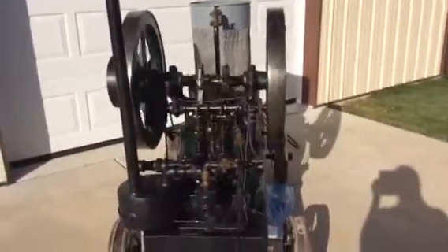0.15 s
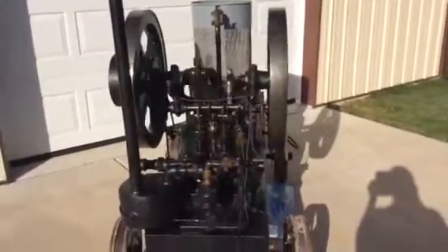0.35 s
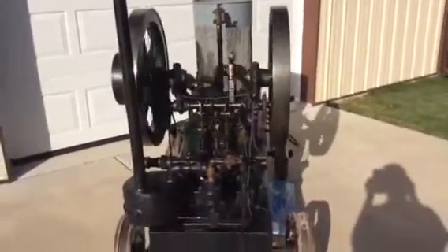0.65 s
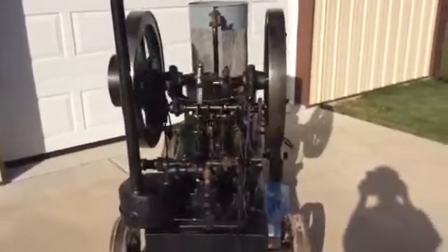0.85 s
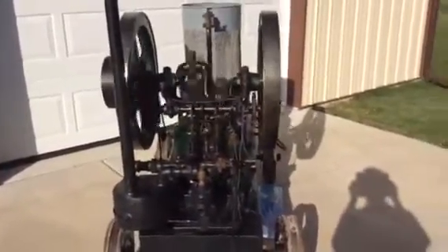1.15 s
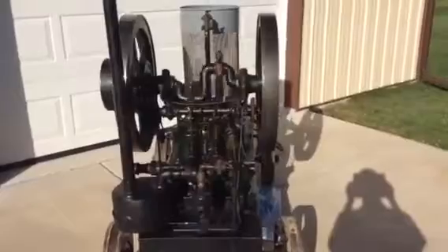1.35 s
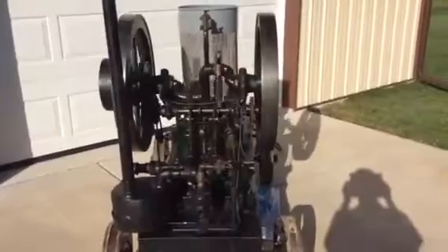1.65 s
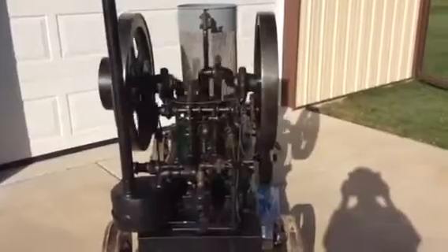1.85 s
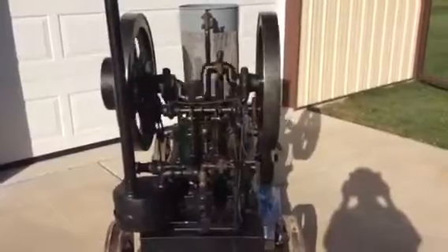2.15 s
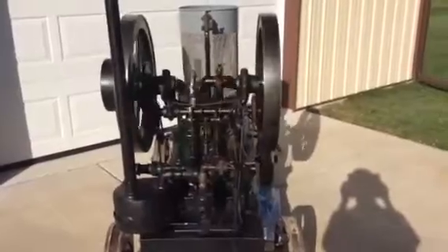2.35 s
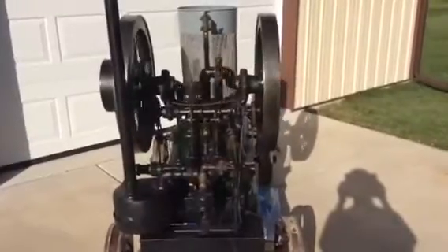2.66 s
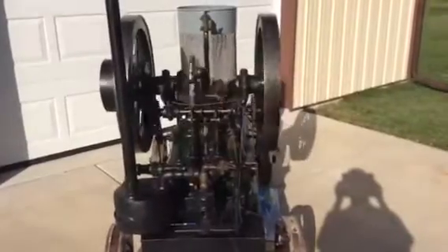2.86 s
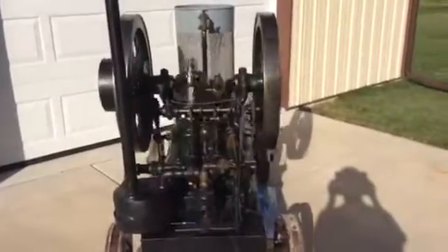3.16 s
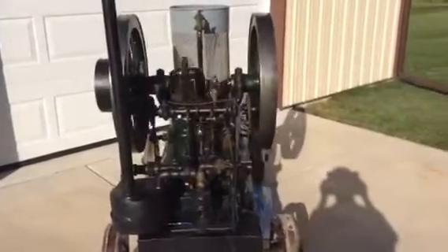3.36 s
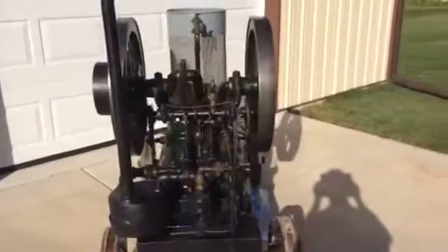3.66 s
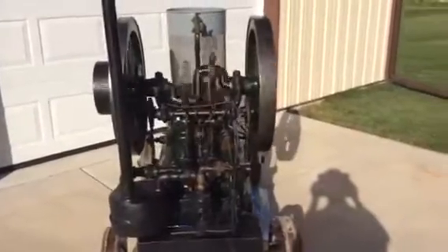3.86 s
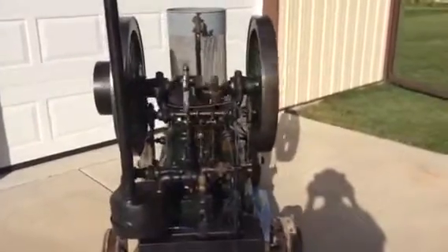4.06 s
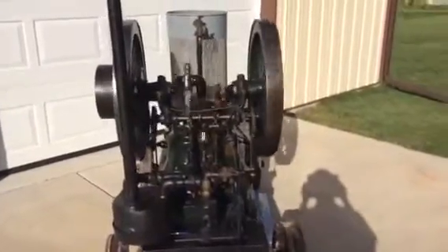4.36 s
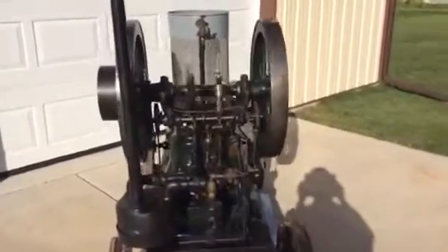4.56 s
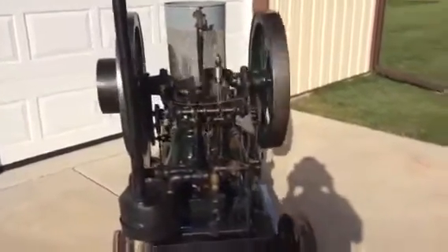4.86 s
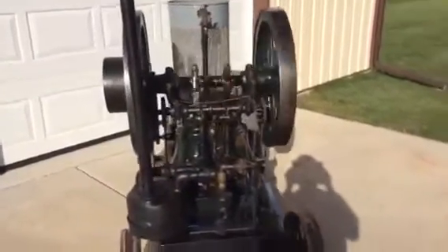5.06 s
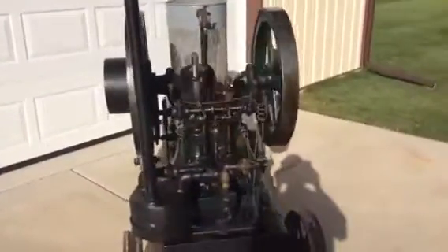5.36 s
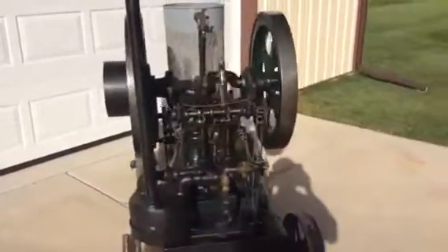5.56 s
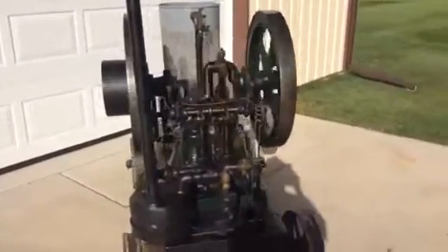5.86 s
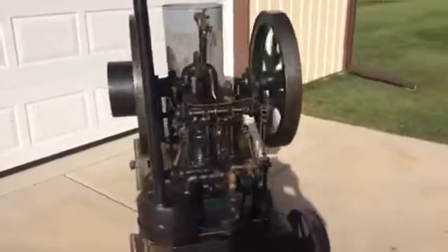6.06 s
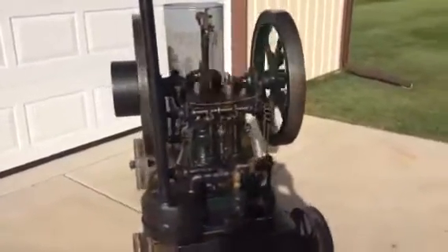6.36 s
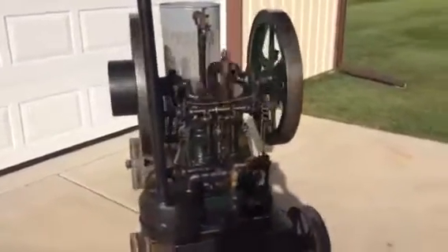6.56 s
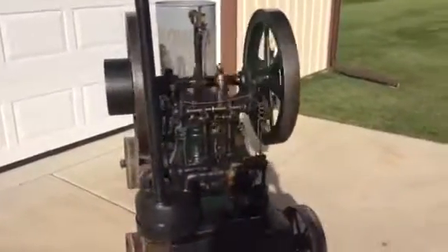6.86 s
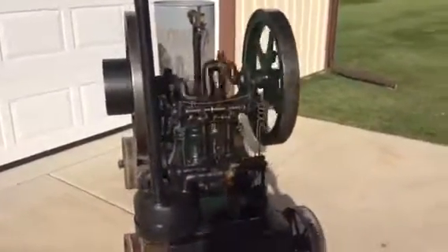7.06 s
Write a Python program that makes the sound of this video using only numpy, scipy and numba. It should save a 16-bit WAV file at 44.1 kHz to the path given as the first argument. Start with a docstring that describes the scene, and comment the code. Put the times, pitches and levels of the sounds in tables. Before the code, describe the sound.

A small old stationary engine coasts outdoors with clattering linkage and ringing latch clicks, twice drawing chattering intake air and barking paired exhaust blasts.

```python
"""A small hit-and-miss twin engine on a cart idles on a concrete drive, two metres away, beside a garage door.
Coasting: linkage and rods knock as noisy contacts through frame modes, a governor latch rings decaying sines
once a cam turn, gears rumble as flickering noise bands and idle strokes breathe low notes.
Firing turns: intake valves chatter as resonances in gated air noise, then two exhaust blasts roar up a stack.
Soft wind lies beneath; three echoes follow the engine."""
import sys
import numpy as np
from scipy import signal
from scipy.fft import rfft, irfft
from scipy.io import wavfile
from scipy.ndimage import uniform_filter1d
from numba import njit

SR = 44100
rng = np.random.default_rng(int(sys.argv[2]) if len(sys.argv) > 2 else 0)


def inscribe(sig):
    """Save sig as 16-bit PCM at rate SR to the path in sys.argv[1].

    A 1-D sig is mono; a 2-D sig holds one channel per row.
    Samples are clipped to [-1, 1] before scaling.
    """
    pcm = np.round(np.clip(np.atleast_2d(sig).T, -1, 1) * 32767)
    wavfile.write(sys.argv[1], SR, pcm.astype(np.int16))


N = 318402


def undb(db):
    """Amplitude factor of a level in dB."""
    return 10 ** (np.asarray(db) / 20)


def unit(x):
    """Scale to rms 1."""
    return x / np.sqrt(np.mean(x ** 2))


def noise():
    """White noise of the scene's length."""
    return rng.standard_normal(N)


def curve(rows, column, outside=-np.inf):
    """A table column interpolated over time at every sample."""
    rows = np.array(rows)
    return np.interp(np.arange(N) / SR, rows[:, 0], rows[:, column], outside, outside)


def latest(values, start_s):
    """Value of the latest event at every sample; the first one's before any."""
    event = np.searchsorted(start_s * SR, np.arange(N)) - 1
    return values[np.clip(event, 0, None)]


@njit
def svf(x, centre_hz, width_hz):
    """State-variable band-pass with a moving centre, gain 1 there."""
    y, band_state, low_state = np.empty(len(x)), 0., 0.
    for i in range(len(x)):
        g = np.tan(np.pi * centre_hz[i] / SR)
        damping = width_hz / centre_hz[i]
        v = (band_state + g * (x[i] - low_state)) / (1 + g * (g + damping))
        band_state = 2 * v - band_state
        low_state += 2 * g * v
        y[i] = damping * v
    return y


def band(x, centre_hz, width_hz):
    """Band-pass with a fixed centre."""
    return svf(x, np.full(N, 1. * centre_hz), 1. * width_hz)


def resonate(x, modes):
    """A bank of resonances, signs alternating so that the valleys fill."""
    return sum((-1) ** k * undb(db) * band(x, hz, width_hz) for k, (hz, width_hz, db) in enumerate(modes))


def coloured(points):
    """Noise of rms 1, its spectrum interpolated in dB over log frequency."""
    hz, db = np.transpose(points)
    bin_hz = np.arange(N // 2 + 1) * SR / N + 1
    gain = undb(np.interp(np.log(bin_hz), np.log(hz), db))
    return unit(irfft(rfft(noise()) * gain, N))


def walk(rate_hz):
    """Random levels held 1 / rate_hz s and slewed twice; spread near 1."""
    hold = int(SR / rate_hz)
    steps = np.repeat(rng.standard_normal(N // hold + 1), hold)
    return 1.344 * uniform_filter1d(uniform_filter1d(steps, hold), hold)[:N]


def swell(start_s, level_db, t60_s, rise_s, hold_s=0.):
    """Envelope of events that rise, hold and die away; powers add."""
    power = np.zeros(N)
    for s, db, t60, hold in np.broadcast(start_s, level_db, t60_s, hold_s):
        i = int(s * SR)
        t = np.arange(min(N - i, int((hold + t60) * SR))) / SR
        rise = 1 - np.exp(-t / rise_s)
        decay = 1000. ** (-np.maximum(t - hold, 0) / t60)
        power[i:i + len(t)] += (undb(db) * rise * decay) ** 2
    return np.sqrt(power)


def rattle(grain_db, rate_hz):
    """Noise of rms 1 broken into uneven contacts."""
    return unit(noise() * undb(grain_db * walk(rate_hz)))


# Wind on the microphone. Each row: time in s, mean level in dB.
WIND = [(0, -59), (2.4, -61), (2.55, -49), (2.7, -63), (3.2, -45.5), (3.6, -63.5), (5.5, -62.5),
        (7.23, -57)]


def wind():
    """Air buffets the microphone: soft low noise whose level wanders."""
    buffet = unit(band(band(noise(), 65, 70), 65, 70))
    return buffet * undb(curve(WIND, 1) + 3 * walk(9))


# Gear and bearing rumble. Each row: time in s, level in dB.
RUMBLE = [(0, -38), (.62, -43), (1.0, -39.5), (1.3, -34.5), (1.88, -41.5), (2.2, -36.5), (3.0, -37.5),
          (4.0, -39.5), (4.85, -40.5), (5.7, -43), (6.2, -34.5), (6.82, -42.5), (7.0, -34.5), (7.23, -37)]
# Gear spectrum. Each row: frequency in Hz, relative density in dB per Hz.
GEAR_SPECTRUM = [(30, -40), (60, -7.5), (110, -13), (172, 7), (420, -7.5), (550, -1), (720, -7.5),
                 (1600, -2), (2100, -0.5), (2550, -19), (3500, -14), (6400, -27.5), (15500, -41)]
# Frame resonances, also shaken by knocks. Each row: centre in Hz, width in Hz, relative level in dB.
FRAME_MODES = [(190, 50, -4), (548, 16, -1.5), (990, 180, -7.5), (1606, 21.4, 0.5), (3300, 280, -15),
               (3975, 32, -13), (4820, 97, -31)]


def gears():
    """Meshing teeth and bearings: bands half an octave apart flicker alone, grainy contacts shake the frame."""
    teeth = coloured(GEAR_SPECTRUM) * undb(2.5 * walk(140))
    teeth += undb(-5) * unit(resonate(rattle(4.5, 130.), FRAME_MODES[1:]))
    shared_db = 1.5 * walk(14)
    rumble = np.zeros(N)
    for hz in 40 * 2 ** np.arange(0, 8.6, .5):
        rumble += band(teeth, hz, hz / 1.35) * undb(shared_db + 3.6 * walk(22))
    return unit(rumble) * undb(curve(RUMBLE, 1))


def play():
    """Loose pins and links tick faintly at random moments."""
    moment, chance = rng.random((150, 2)).T
    order = np.argsort(moment)
    level_db = -52 - 3.2 * np.log(chance[order])
    shake = noise() * swell(moment[order] * N / SR, level_db, 0.014, 0.00013)
    return band(shake, 15500, 15000) + undb(13.5) * band(shake, 1120, 900)


# Cam turns, longer as the flywheels slow.
# Each row: start in s, relative latch level in dB, relative linkage level in dB, pumping level in dB.
TURNS = [(-.465, -7, -0.5, -34.5), (0.192, -5.5, -1, -33.5), (0.8928, -7.5, 0, -40),
         (1.624, -13.5, -5.5, -32), (2.144, -6, -1.5, -34), (2.6732, -5, -1, -31.5),
         (3.2295, -7.5, -1, -30), (3.8158, -6, -3.5, -30.5), (4.434, -6, -1, -31.5),
         (5.0928, -7.5, -0.5, -32.5), (5.7937, -9.5, 0, -37), (6.528, -30, -5, -34.5), (7.0473, -8, 0, -32),
         (7.575, -7, 0, -32)]
# Indices of the turns that fire.
FIRING_TURNS = (2, 10)
IDLE_AGAIN = .65  # share of the turn after firing until the exhaust is held open again


def on_turns(shares):
    """Times in s of given shares of every coasting turn, with indices of turn and share."""
    start_s = np.array(TURNS)[:, 0]
    turn, k = np.indices((len(start_s) - 1, len(shares))).reshape(2, -1)
    s = start_s[turn] + shares[k] * np.diff(start_s)[turn]
    firing = np.isin(turn, FIRING_TURNS)
    recovering = np.isin(turn - 1, FIRING_TURNS) & (shares[k] < IDLE_AGAIN)
    keep = ~(firing | recovering) & (s > .01) & (s < N / SR - .01)
    return s[keep], turn[keep], k[keep]


# Idle strokes of a coasting turn. Each row: share of the turn, level in dB against the turn's pumping.
STROKES = [(.22, 0), (.47, -3), (.71, -4), (.965, 1.5)]


def pumping():
    """Each idle stroke breathes a short low note out of the pipe."""
    share, stroke_db = np.transpose(STROKES)
    s, turn, k = on_turns(share)
    level_db = np.array(TURNS)[turn, 3] + stroke_db[k]
    note_hz = 174 * (1 + .04 * walk(15))
    note = np.sin(2 * np.pi * np.cumsum(note_hz) / SR)
    breath = unit(band(noise(), 244, 84))
    return (note + undb(-3.5) * breath) * swell(s, level_db, 0.25, 0.018, 0.0084)


# Exhaust blasts. Each row: start in s, relative gas level in dB, relative valve thump level in dB,
# blow-down hold in s, ring of the cylinder's pipe in Hz.
BLASTS = [(1.5803, -2.5, -16.5, 0.021, 1754), (1.7205, -4.5, -21.5, 0.022, 2010),
          (6.4823, -3, -16.5, 0.029, 1740), (6.624, -4.5, -18, 0.026, 2044)]
# Stack roar spectrum. Each row: frequency in Hz, relative density in dB per Hz.
STACK_SPECTRUM = [(240, -61), (400, -18), (772, -20.5), (942, -8.5), (1280, -24.5), (1690, -7.5), (2060, 3),
                  (2510, -12.5), (3970, -1.5), (4630, -13), (6990, -12.5), (12900, -19), (15500, -18)]
# Stack resonances. Each row: centre in Hz, width in Hz, relative level in dB.
STACK_MODES = [(1710, 80, 6.5), (1872, 35, 6), (1997, 52, -1.5), (2840, 70, 5), (3250, 65, -13),
               (3900, 80, -31)]


def exhaust():
    """The valve cracks open with a thump; gas then roars up the sheet-steel stack, which rattles on."""
    s, gas_db, thump_db, hold_s, hz = np.transpose(BLASTS)
    pipe_hz = latest(hz, s)
    # the power steepens the rise and decay and stretches the dB range
    gas = swell(s - .003, gas_db - 9.0, 0.18, .011, hold_s) ** 1.266
    roar = coloured(STACK_SPECTRUM) * undb(2.2 * walk(250)) * gas
    ring = resonate(rattle(0.85, 150.) * gas, STACK_MODES)
    ring += undb(10.5) * svf(rattle(5.2, 120.) * gas, pipe_hz, 106.0)
    ring += undb(-1) * svf(rattle(3.9, 120.) * gas, 2.1 * pipe_hz, 150.)
    tail = unit(svf(rattle(2.4, 90.), pipe_hz, 300.)) * swell(s, gas_db - 23.5, 0.47, 0.017, hold_s)
    puff = np.diff(swell(s - .005, thump_db, 0.066, 0.0019), prepend=0)
    thump = undb(50.0) * band(puff, 212, 34)
    return undb(4.0) * roar + undb(11.5) * ring + tail + thump


# Suction strokes. Each row: start in s, length in s, relative air flow in dB.
SUCTION = [(1.113, 0.41, -27.5), (6.018, 0.417, -25.5)]
INRUSH_DB, CLOSE_DB = 0.5, -27.5  # against the steady flow
INRUSH_S, CLOSE_S = 0.029, 0.027


def suction(start_s, length_s, flow_db):
    """Air flow of one stroke: an inrush, a steady pull, a quick close."""
    end_s = start_s + length_s
    rows = [(start_s, flow_db + INRUSH_DB), (start_s + INRUSH_S, flow_db),
            (end_s - CLOSE_S, flow_db), (end_s, flow_db + CLOSE_DB)]
    return undb(curve(rows, 1))


# Intake valve clashes on its seat. Each row: time in s, relative level in dB.
CLASHES = [(1.118, -5), (1.139, -11), (1.1524, -11), (1.3297, -6), (1.3706, -6), (1.407, -10.5),
           (1.449, -10), (6.023, -5), (6.058, -29), (6.1723, -22), (6.2302, -7), (6.352, -8.5)]
# Air pulses of every suction. Each row: time after its start in s, relative level in dB.
KICKS = [(-.001, -34.5), (.032, -31.5), (.08, -38), (.255, -37.5)]
# Intake valve resonances. Each row: centre in Hz, width in Hz, relative level in dB.
VALVE_MODES = [(1030, 490, -14), (1814, 67, -1.5), (2902, 29.6, 7), (5510, 260, -16.5), (6140, 45, -3),
               (7860, 69, -18), (10370, 110, -20), (12400, 120, -12)]


def intake():
    """Air rushes past the spring-loaded valve, which sings unsteadily, clashes on its seat and kicks the air column."""
    clash_s, clash_db = np.transpose(CLASHES)
    after_s, pulse_db = np.transpose(KICKS)
    flow = sum(suction(*stroke) for stroke in SUCTION)
    clash = (flow > 0) * swell(clash_s, clash_db - 5.5, 0.069, 0.0025)
    eddies = rattle(3.25, 120.)
    air = eddies * (flow + clash)
    pull = eddies * (flow + 0.43 * clash)
    ring = np.zeros(N)
    # each mode catches the flow and loses it again on its own
    for hz, width_hz, db in VALVE_MODES:
        catch = undb(db + 3.5 * walk(28))
        ring += catch * svf(pull, hz * (1 + 0.0012 * walk(13)), 1. * width_hz)
    kicks = np.zeros(N)
    for stroke in SUCTION:
        kicks[((stroke[0] + after_s) * SR).astype(int)] = undb(pulse_db)
    hiss = undb(-13.5) * band(air, 4600, 14000)
    column = undb(55) * band(band(kicks, 107, 120), 102, 110)
    return undb(17.5) * ring + hiss + column


# Latch modes. Each row: frequency in Hz, relative level in dB, t60 in s.
LATCH_MODES = [ (1975, -7, .12), (3585, -13, .07), (5685, -16, .05), (14300, -9, .04), (10172, -7, .075),
               (10295, -4, .08)]
# the high ping is clearest while the microphone faces the latch
PING_FACES_S, PING_FADE_DB_PER_S, PING_ABOVE_HZ = 3.2, 3, 8000


def latch():
    """The cam lifts the latch, then it snaps home: the steel rings, a little differently each time, and shakes the frame."""
    s, blow_db = np.transpose(TURNS[1:-1])[:2]
    hz, mode_db, t60_s = np.transpose(LATCH_MODES)[:, :, None]
    t = np.arange(SR // 8) / SR
    ring = np.zeros(N + len(t))
    for start, db in zip((s * SR).astype(int), blow_db):
        scatter_db = 3 * rng.standard_normal((len(hz), 1))
        fade_db = PING_FADE_DB_PER_S * abs(start / SR - PING_FACES_S) * (hz > PING_ABOVE_HZ)
        level = undb(mode_db + db - 7.5 + scatter_db - fade_db)
        modes = level * np.sin(2 * np.pi * hz * t) * 1000. ** (-t / t60_s)
        ring[start:start + len(t)] += modes.sum(axis=0)
    bright = unit(band(rattle(5.7, 330.0), 4800, 24000))
    dull = unit(band(rattle(0.75, 160.0), 1510, 780))
    snap = bright * swell(s, blow_db - 9, 0.065, .0001) + dull * swell(s, blow_db - 12.0, 0.11, 0.01)
    lift = (dull + undb(-9) * bright) * swell(s - .013, blow_db - 22, .05, .001)
    return ring[:N] + snap + lift


# Linkage blows of a coasting turn. Each row: share of the turn, relative level in dB, pitch in Hz,
# treble against that level in dB, level change in dB per s of longer turn.
LINKAGE = [(.4045, -33, 2120, 17, 52), (.751, -21, 1910, 9.5, -4), (.83, -25, 1500, 6, -28),
           (0.846, -27, 1570, -29, 29)]
# Loose rods, never quite in step. Each row: time in s, relative level in dB, pitch in Hz.
RODS = [(0.355, -18.5, 1950), (0.542, -27.5, 1670), (1.032, -18, 1550), (1.077, -16.5, 1940),
        (1.206, -18, 1630), (2.11, -22, 1510), (2.178, -20, 1680), (2.262, -16, 1570), (2.791, -17.5, 1510),
        (3.27, -26.5, 1660), (3.355, -19.5, 1510), (3.533, -22.5, 1620), (3.95, -20, 1940),
        (4.116, -22, 1570), (4.58, -19.5, 1534), (4.769, -25.5, 1510), (5.251, -21, 1930),
        (5.43, -27.5, 1510), (5.49, -32, 1490), (5.532, -36, 1410), (5.586, -39, 1210), (5.934, -18, 1570),
        (5.979, -15.5, 1450), (7.105, -20.5, 1500), (7.169, -19, 1970)]
COASTING_TREBLE_DB, FIRING_TREBLE_DB = -14, -11.5  # rods, against their level
MEAN_TURN_S = .6


def blows():
    """Linkage and rod blows in order of time: time in s, level in dB, pitch in Hz, treble in dB."""
    start_s, _, linkage_db, _ = np.transpose(TURNS)
    share, db, hz, treble_db, slow_db_per_s = np.transpose(LINKAGE)
    s, turn, k = on_turns(share)
    longer_s = np.diff(start_s)[turn] - MEAN_TURN_S
    level_db = db[k] + linkage_db[turn] + slow_db_per_s[k] * longer_s
    linkage = np.c_[s, level_db, hz[k], treble_db[k]]
    rod_turn = np.searchsorted(start_s, np.array(RODS)[:, 0]) - 1
    rod_treble_db = np.where(np.isin(rod_turn, FIRING_TURNS), FIRING_TREBLE_DB, COASTING_TREBLE_DB)
    rows = np.r_[linkage, np.c_[RODS, rod_treble_db]]
    return rows[np.argsort(rows[:, 0])].T


def knocks():
    """Each blow rattles its own part and the frame, and spits treble with a faint hissing tail."""
    s, db, hz, treble_db = blows()
    part_hz = latest(hz, s)
    shake = rattle(2.6, 170.)
    shake[(s * SR).astype(int) + 20] += 14  # the first contact is the hardest
    part = svf(svf(shake, part_hz, 690.0), part_hz, 690.0)
    frame = band(resonate(shake, FRAME_MODES), 1740, 2130)
    body = (unit(part) + undb(-2) * unit(frame)) * swell(s, db - 9, 0.14, 0.00066, .012)
    click = band(noise(), 5000, 14000) * swell(s, db + 3 * treble_db - 44, .022, .0002)
    # small hard parts sound brightest and stop soonest
    tick_t60_s = np.maximum(.14 - 0.0047 * treble_db, .03)
    spit = swell(s, db + treble_db - 18.0, tick_t60_s, 0.00034)
    hiss = swell(s, db + treble_db - 36.0, 0.2, 0.0025)
    tick = unit(band(rattle(3.2, 180.0), 4400, 24000)) * (spit + hiss)
    return body + click + tick


# Echoes off concrete, door and wall. Each row: delay in s, level in dB before the band-pass.
ECHOES = [(.006, -13.5), (0.014, -17.5), (.024, -16)]


def scene():
    """The engine, its band-passed echoes and the wind."""
    engine = gears() + play() + pumping() + exhaust() + intake() + latch() + knocks()
    echoes = sum(undb(db) * np.pad(engine, (int(delay_s * SR), 0))[:N] for delay_s, db in ECHOES)
    return (engine + band(echoes, 2130, 4200) + wind())[None]


def record(dry):
    """The microphone rounds peaks; its port lifts 13.8 kHz and dips 6.9 kHz; two low-passes cut the top."""
    rounded = np.tanh(1.15 * dry) / 1.15
    lift = undb(-7.0) * band(rounded[0], 13800, 2100)
    dip = undb(-5.5) * band(rounded[0], 6920, 1950)
    port = rounded + lift - dip
    dull = signal.sosfilt(signal.ellip(6, .3, 30, 15250, fs=SR, output="sos"), port)
    return signal.sosfilt(signal.ellip(8, .2, 70, 16600, fs=SR, output="sos"), dull)


dry = scene()
out = record(dry)
inscribe(out)
```